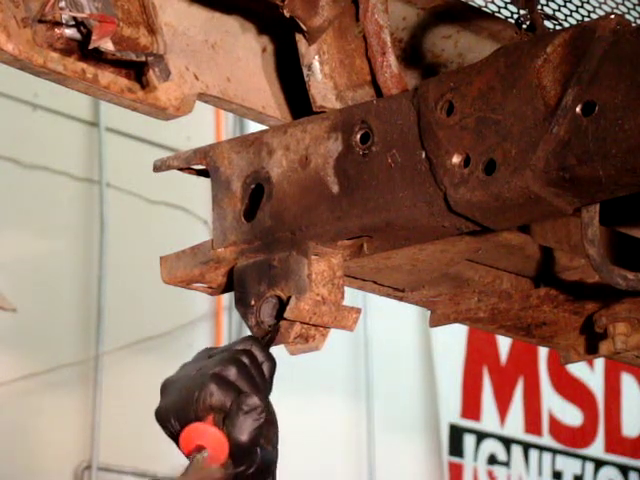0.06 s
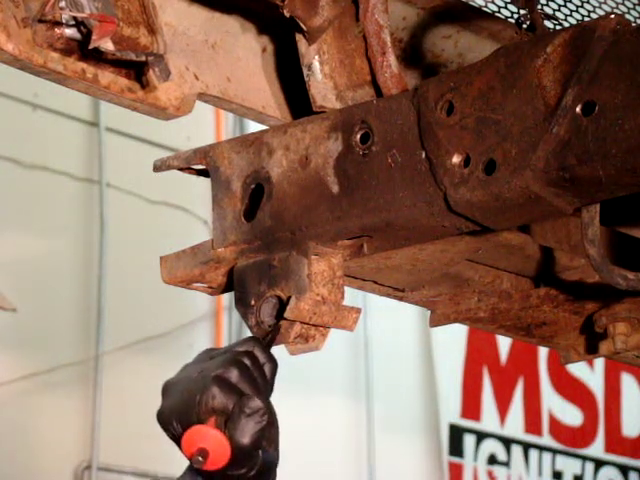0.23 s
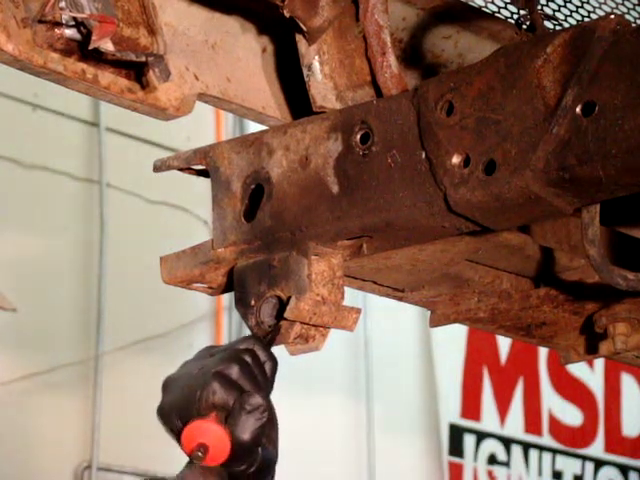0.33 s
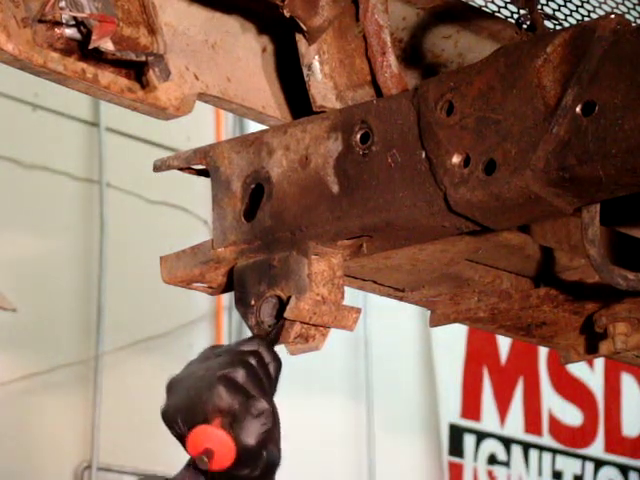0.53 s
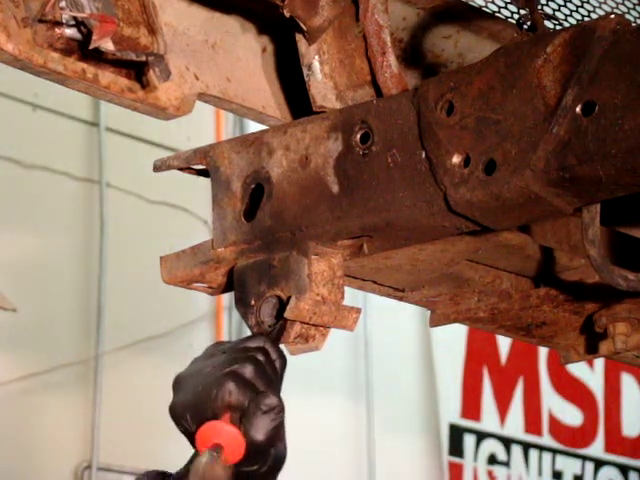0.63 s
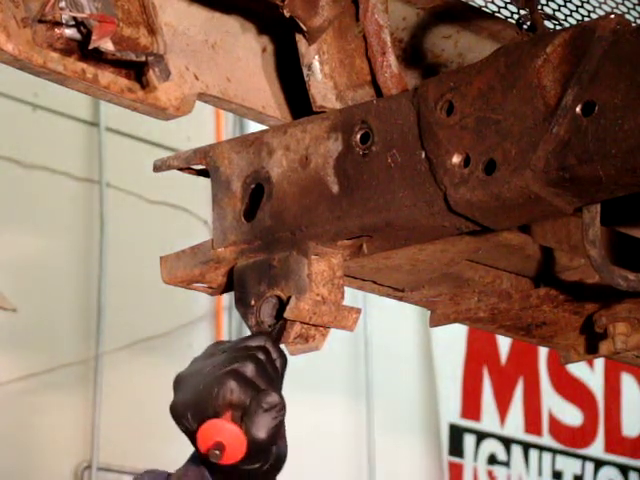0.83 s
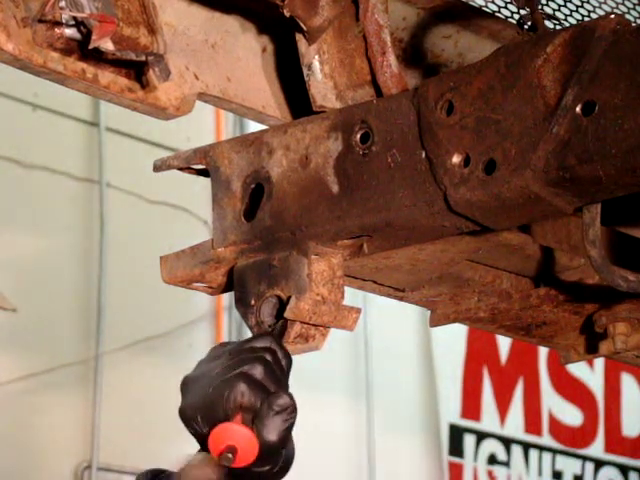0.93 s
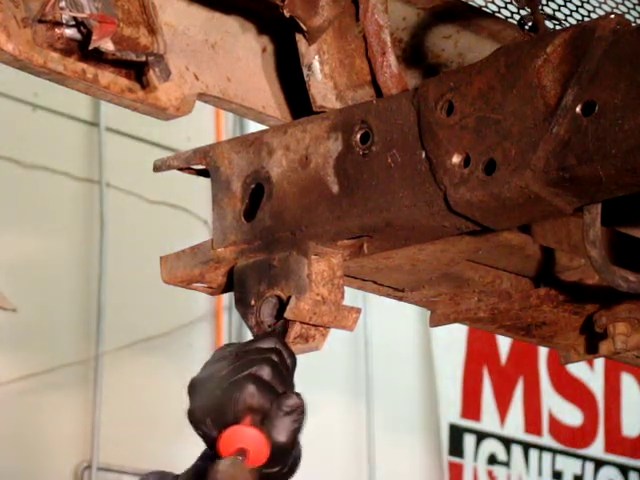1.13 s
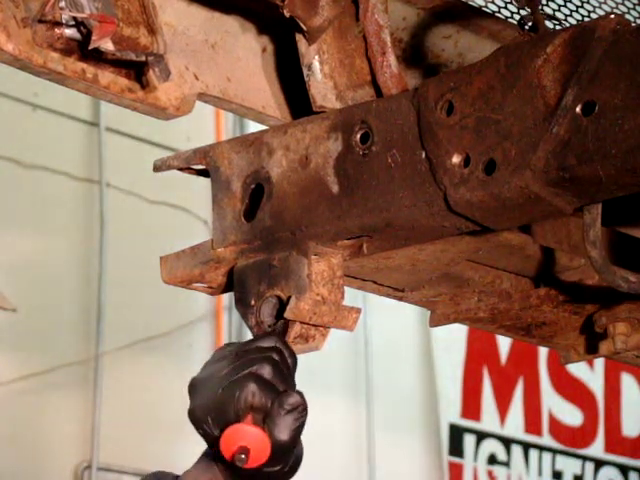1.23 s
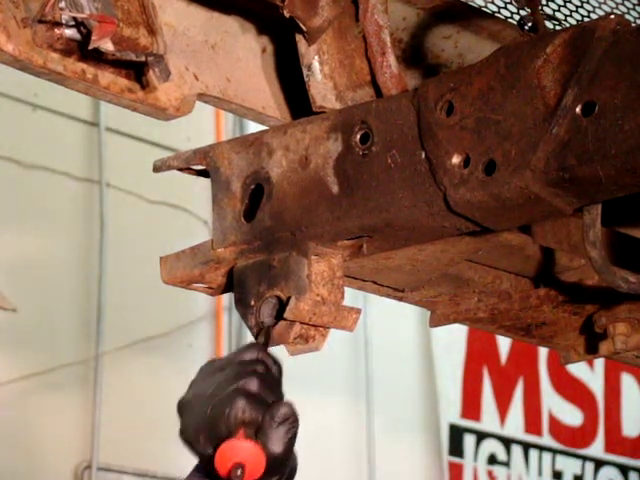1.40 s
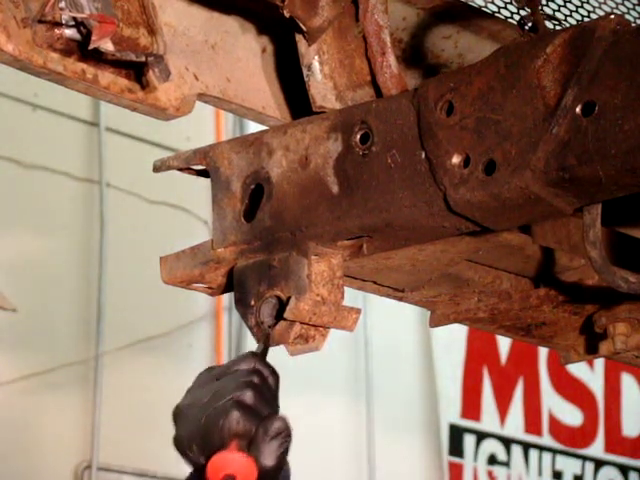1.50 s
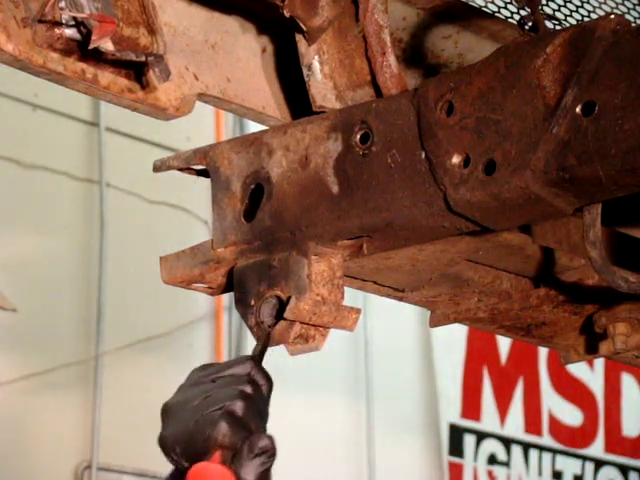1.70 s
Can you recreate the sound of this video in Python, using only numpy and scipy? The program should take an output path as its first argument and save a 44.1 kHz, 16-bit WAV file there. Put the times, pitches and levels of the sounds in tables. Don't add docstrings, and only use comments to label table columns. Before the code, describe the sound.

A hammer cracks against a steel punch five times, each ringing into a dense garage echo.

```python
import sys
import numpy as np
from scipy import signal
from scipy.fft import rfft, irfft
from scipy.io import wavfile
from scipy.ndimage import uniform_filter1d

SR = 44100
rng = np.random.default_rng(int(sys.argv[2]) if len(sys.argv) > 2 else 0)


def elevation(decibels):
    levels = np.asarray(decibels, float)
    return 10 ** (levels / 20)


def output_pcm(signal):
    pcm = np.clip(np.atleast_2d(signal).T, -1, 1) * 32767
    wavfile.write(sys.argv[1], SR, np.round(pcm).astype(np.int16))


N = 77175
T = np.arange(N) / SR


def rms_one(x):
    return x / np.sqrt(np.mean(x ** 2) + 1e-20)


def at_hz(points, hz, axis=1):
    points = np.array(points)
    return np.interp(np.log(hz), np.log(points[:, 0]), points[:, axis])


def filtered(x, order, hz, kind):
    return signal.sosfilt(signal.butter(order, hz, kind, fs=SR, output="sos"), x)


def filtered_in_place(x, order, hz, kind):
    return signal.sosfiltfilt(signal.butter(order, hz, kind, fs=SR, output="sos"), x)


def bands(white):
    edges = 40 * 2 ** np.arange(0, 8.4, 1 / 3)
    for k, (low, high) in enumerate(zip(edges, edges[1:])):
        yield np.sqrt(low * high), filtered(white[k % 2], 2, [low, high], "band")


def coloured(spectrum, size):
    white = rng.standard_normal((2, size))
    return rms_one(sum(elevation(at_hz(spectrum, hz)) * band for hz, band in bands(white)))


def drift(rate, count):
    r = np.exp(-2 * np.pi * rate / SR)
    chance = rng.standard_normal((count, N + SR // 4))
    settled = signal.lfilter([1], [1, -2 * r, r * r], chance)[:, -N:]
    return rms_one(settled)


def ring(hz, t60):
    click = np.zeros(N)
    click[0] = 1
    r, w = elevation(-60 / (t60 * SR)), 2 * np.pi * hz / SR
    return signal.lfilter([0, np.sin(w)], [1, -2 * r * np.cos(w), r * r], click + 1e-18)


# frequency in Hz, density in dB per Hz.
AIR = [(25, -14), (65, -2), (110, -6), (330, 7.5), (620, -6), (2000, -7.5), (5000, -10.5), (10400, -17.5)]
AIR_DB, AIR_DUCK_DB, DUCK_S = -43.5, -7, 0.72


def garage_air(first_blow_s):
    ducked_db = AIR_DUCK_DB * np.clip((T - first_blow_s) / DUCK_S, 0, 1)
    return elevation(AIR_DB + ducked_db) * coloured(AIR, size=N)


# frequency in Hz, density in dB per Hz.
CRACK = [(60, -54.5), (130, -7), (300, -2), (1000, -3.5), (1700, -4.5), (3000, -1), (5500, -6),
         (10400, -12.5)]
CRACK_DB, CRACK_S = -2, 0.0041


def crack():
    return elevation(CRACK_DB) * coloured(CRACK, size=N) * np.exp(-T / CRACK_S)


# low mode in Hz, its level in dB, high mode in Hz, its level in
# dB.
CLANG = [
    (2930, -3.5, 6160, -21),
    (2550, -6.5, 5900, -12.5),
    (2040, -1, 3200, -12),
    (2060, 2.5, 7200, -2),
    (2150, 1.3, 5800, -4.5),
]
CLANG_T60_S = 0.021


def seated_clang(low_hz, low_db, high_hz, high_db):
    return elevation(low_db) * ring(low_hz, CLANG_T60_S) - elevation(high_db) * ring(high_hz, CLANG_T60_S)


# mode in Hz, width in Hz, level in dB.
RING_1 = [(1810, 24, -10), (2066, 36, -6.5), (2790, 81, -6.5), (3040, 52, -0.5), (3450, 45, -1),
          (4030, 37, -11), (4180, 46, -1), (5380, 38, -10.5)]
RING_2 = [(1442, 23, -3.5), (2090, 64, -3.5), (2800, 240, -1.5), (3300, 1160, -4.5), (3426, 19, -1.5),
          (3830, 47, -9), (8100, 350, -9), (3340, 44, -7)]
RING_3 = [(1306, 315, -3.5), (2070, 130, 0), (2550, 85, -6.5), (4210, 370, -7), (4450, 55, -3),
          (5180, 120, -8), (6300, 47, -20), (10300, 120, -15.5)]
RING_4 = [(1390, 80, -5), (2087, 270, -1), (2980, 60, -8), (4296, 110, 0.5), (4770, 34, -3),
          (5240, 170, -6.5), (6840, 27, -11), (1180, 164, -6)]
RING_5 = [(1230, 290, -2.5), (2160, 230, -2.5), (2540, 35, -3.5), (2800, 190, -23), (3240, 45, -23),
          (3660, 27, -15.5), (4360, 250, -7), (6500, 39, -12)]
RINGS = [RING_1, RING_2, RING_3, RING_4, RING_5]
RING_DB, WIDEN_HZ = -11.5, 56.5


def punch_and_sleeve(modes):
    out = np.zeros(N)
    for k, (hz, width_hz, db) in enumerate(modes):
        t60 = np.log(1000) / np.pi / (width_hz + WIDEN_HZ)
        out += (-1) ** k * elevation(RING_DB + db) * ring(hz, t60)
    return out


# frequency in Hz, level in dB, fall by 60 dB in seconds.
FRAME = [(158.7, -6, 0.64), (300.5, 4, 0.56), (379.9, 10, 0.69), (502, -5, 0.58), (558, -2.5, 0.58),
         (753, 13, 0.43), (1174, -1.5, .6)]
FRAME_DB, SHAKE_S = -24.5, 0.09
FRAME_WAVER, WAVER_PER_S = 0.4, 10


def frame_hum(body_db):
    swell = (1 - np.exp(-T / SHAKE_S)) ** 2
    waver = 1 + FRAME_WAVER * drift(WAVER_PER_S, len(FRAME))
    out = np.zeros(N)
    for (hz, db, t60), unsteady in zip(FRAME, waver):
        out += elevation(FRAME_DB + body_db + db) * ring(hz, t60) * swell * unsteady
    return out


def blow(modes, clang, body_db):
    return crack() + seated_clang(*clang) + punch_and_sleeve(modes) + frame_hum(body_db)


BODY_HZ, BRIGHT_HZ, TAIL_RING_DB = 900, 4500, 8.5


def colour(modes, body_db, bright_db):
    hz = np.arange(1, N // 2 + 2) * SR / N
    peaks = sum(elevation(2 * (TAIL_RING_DB + db)) / (1 + (2 * (hz - top_hz) / width_hz) ** 2)
                for top_hz, width_hz, db in modes)
    tilt_db = body_db / (1 + (hz / BODY_HZ) ** 2) + bright_db / (1 + (BRIGHT_HZ / hz) ** 2)
    return elevation(tilt_db) * np.sqrt(elevation(2 * at_hz(CRACK, hz)) + peaks)


# frequency in Hz, fall by 60 dB in seconds, build-up in seconds, level in dB.
GARAGE = [(130, 0.88, 0.049, -10), (350, 1.23, 0.016, 0), (900, 1.11, 0.0075, 2),
          (2310, 1.147, 0.0032, 0.5), (5370, 0.8, .008, 1.5), (8330, 0.5, 0.0061, 1.5)]
TAIL_DB, SAME_TAIL = -7, 0.23
GRAIN_DB, GRAIN_PER_S, GRAIN_FADE_S = 3, 700, 0.12


def garage(colours):
    alike = rng.standard_normal((2, 1, N))
    own = rng.standard_normal((2, len(colours), N))
    white = np.sqrt(SAME_TAIL) * alike + np.sqrt(1 - SAME_TAIL) * own
    lumps_db = GRAIN_DB * np.exp(-T / GRAIN_FADE_S) * drift(GRAIN_PER_S, len(colours))
    struck = irfft(rfft(white * elevation(lumps_db)) * colours, N)
    tails = 0
    for hz, band in bands(struck):
        fall_db = at_hz(GARAGE, hz, axis=3) - 60 * T / at_hz(GARAGE, hz)
        build_up = (1 - np.exp(-T / at_hz(GARAGE, hz, axis=2))) ** 2
        tails = tails + band * elevation(fall_db) * build_up
    return elevation(TAIL_DB) * tails


# start in seconds, peak in dB, echo in dB, low body in dB, brightness in dB.
BLOWS = [
    (0.202, 1, 2, 5.5, -0.5),
    (0.472, -1.5, 2.5, 2.5, -2.5),
    (0.732, -2, 0, 3.5, 3.5),
    (0.991, -3.5, 1.5, 4, -1.5),
    (1.24, -3.5, 0.5, 3, 2),
]
ARRIVES_S = 0.00018


def scene():
    colours = [colour(modes, body_db, bright_db)
               for (_, _, _, body_db, bright_db), modes in zip(BLOWS, RINGS)]
    out, tails = np.zeros(N), garage(colours)
    for (s, db, tail_db, body_db, _), modes, clang, tail in zip(BLOWS, RINGS, CLANG, tails):
        start = int((s + ARRIVES_S) * SR)
        heard = blow(modes, clang, body_db) + elevation(tail_db) * tail
        out[start:] += elevation(db) * heard[:N - start]
    return out[None]


# length in seconds, lower edge in Hz.
STARVED = [
    (0.0074, 750),
    (0.023, 4600),
    (0.003, 4100),
    (0.0049, 3700),
    (0.004, 3800),
]
STARVE_DB, SMEAR_S, SMEAR_DB = -30, 0.004, -20


def starve_and_smear(x):
    smear = filtered(coloured(CRACK, size=N), 2, BODY_HZ, "high")
    for (s, db, *_), (length_s, above_hz) in zip(BLOWS, STARVED):
        treble = filtered_in_place(x, 10, above_hz, "high")
        ahead = (T > s - SMEAR_S - length_s) & (T < s - 0.001)
        x = x - (1 - elevation(STARVE_DB)) * uniform_filter1d(1. * ahead, size=90) * treble
        rise = np.clip(1 + (T - s) / SMEAR_S, 0, 1) ** 2 * (T < s + ARRIVES_S)
        x = x + elevation(db + SMEAR_DB) * smear * rise
    return x


GAP_FROM_S, GAP_TO_S, GAP_ABOVE_HZ, GAP_DB = 0.008, 0.03, 5800, -18


def gaps(x):
    edges = GAP_ABOVE_HZ * 2 ** np.arange(0, 1, 0.15)
    after = sum((T > s + GAP_FROM_S) & (T < s + GAP_TO_S) for s, *_ in BLOWS)
    for low, high, chance in zip(edges, edges[1:], drift(60, count=6)):
        band = filtered_in_place(x, 5, [low, high], "band")
        dropped = uniform_filter1d(1. * after * (chance < 0.1), size=60)
        x = x - (1 - elevation(GAP_DB)) * dropped * band
    return x


def low_pass(x):
    return signal.sosfilt(signal.butter(12, 10750, fs=SR, output="sos"), x)


TOP, LOW_CUT_HZ, CUTOFF_HZ = 0.89, 134, 10330


def record(dry):
    x = filtered(TOP * np.tanh(dry / TOP), 4, LOW_CUT_HZ, "high")
    x = x + garage_air(first_blow_s=BLOWS[0][0])
    x = gaps(starve_and_smear(x))
    mix = signal.sosfiltfilt(signal.cheby2(14, 30, CUTOFF_HZ, fs=SR, output="sos"), x)
    return low_pass(mix)


dry = scene()
out = record(dry)
output_pcm(out)
```